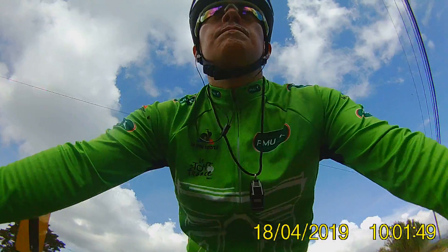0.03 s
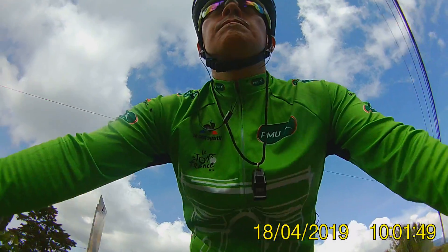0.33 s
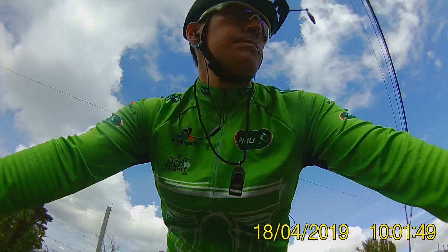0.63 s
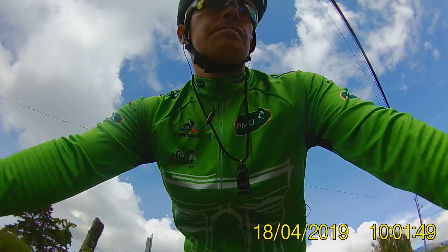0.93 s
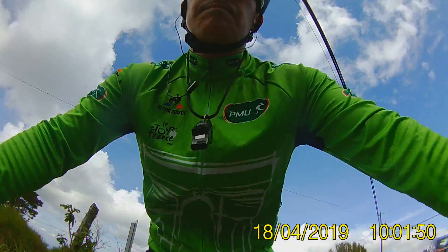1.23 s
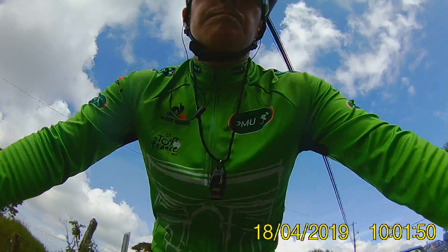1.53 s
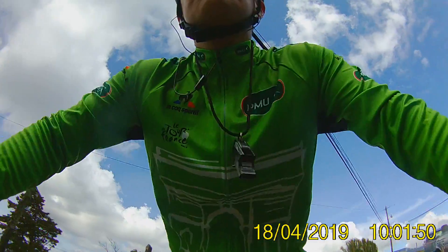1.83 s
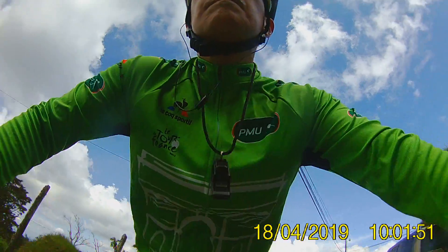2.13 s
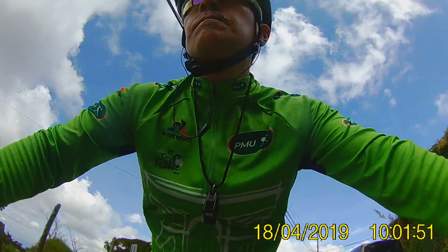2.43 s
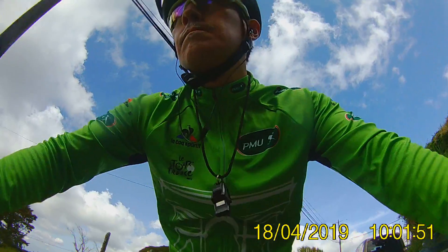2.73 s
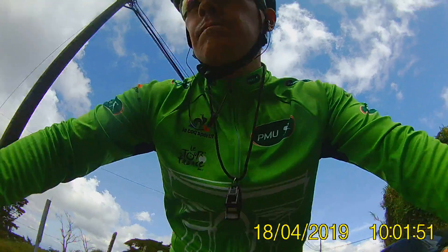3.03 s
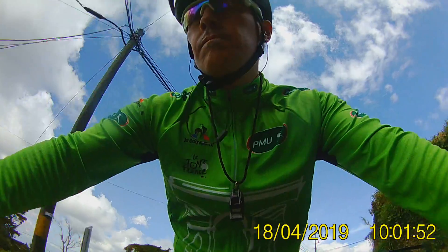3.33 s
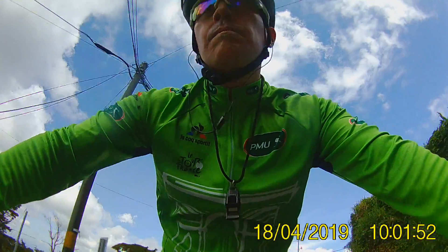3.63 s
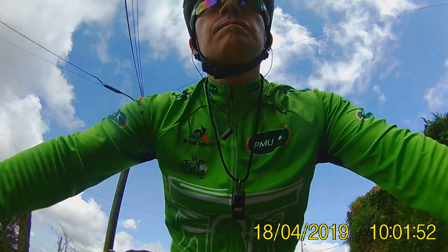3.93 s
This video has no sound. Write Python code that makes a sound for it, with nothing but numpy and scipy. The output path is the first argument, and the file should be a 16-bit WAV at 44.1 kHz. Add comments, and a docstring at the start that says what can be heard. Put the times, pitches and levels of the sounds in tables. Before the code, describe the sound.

A bicycle rattles outdoors over steady road rumble and wind, close to a handlebar microphone. Small ticks and faint chain clinks give way to loud metallic clacks and bumps as a low hum swells.

```python
"""A bicycle rolls along a road, heard from a camera fixed to its handlebar.
From the start the road shakes the mount into a low drone over wind and tyre noise; loose parts tick
and bumps knock the housing. From about 1 s the chain rubs, then clinks, and a low hum swells.
At 2.2 s a hard part slaps metal twice, overloading the microphone. Heavier knocks follow,
and from 3.7 s a second pair of clacks rings out."""
import sys
import numpy as np
from scipy import signal
from scipy.fft import rfft, irfft
from scipy.io import wavfile

SR = 44100
rng = np.random.default_rng(int(sys.argv[2]) if len(sys.argv) > 2 else 0)


def generate_wav(sig):
    """Save sig (samples, or channels by samples) to the path in sys.argv[1] as 16-bit PCM at SR."""
    pcm = np.round(np.clip(np.atleast_2d(sig).T, -1, 1) * 32767).astype(np.int16)
    wavfile.write(sys.argv[1], SR, pcm)


N = 176400
HIT_T = np.arange(SR // 2) / SR  # time axis of one hit, t/s

# Levels in the tables are relative; each layer adds its own trim.
# fader rides of the bed: t/s, hum/dB, frame ring/dB, tyre roar/dB, tyre hiss/dB
BED_LEVELS = [(0, -47, -27, -37, -47.5), (.69, -42, -27, -31, -42), (1.83, -28.5, -31.5, -40, -51),
              (2.4, -19.5, -27, -31.5, -44.5), (3.4, -17.5, -27, -36.5, -49), (4, -14, -24, -29.5, -41.5)]
# spectra of the wind rumble, the tyres' roar and their hiss: f/Hz, level/dB
WIND_EQ = [(15, -4), (55, -5), (72, -1.5), (85, -1), (135, 1), (165, -5), (250, -11), (390, -29),
           (900, -72.5)]
ROAR_EQ = [(390, -4.5), (560, 6.5), (700, -1.5), (880, 2.5), (1050, -12), (1170, 5.5), (1250, 9),
           (1400, -6.5), (1800, -11.5), (2600, -51)]
HISS_EQ = [(800, 11), (1020, -3), (1300, 10), (1700, 14), (2300, 3.5), (2950, 6.5), (3500, -6.5),
           (4200, -5), (5200, -15), (6400, -17.5), (16000, -54.5)]
# pitch of the low hum: t/s, f/Hz
HUM_PITCH = [(0, 200), (1.9, 192), (2.4, 180.5), (2.9, 195.8), (3.7, 196.4), (4, 216.3)]
# resonances of the frame: f/Hz, width/Hz, level/dB
FRAME_BANDS = [(312.6, 18.2, 3.5), (339.5, 18, -1.5), (446.2, 6.4, -8.5), (551.3, 26, -8)]
# fader ride of the mount's drone: t/s, level/dB
MOUNT_SHAKE = [(0.0, -2), (0.2, -42.5), (0.32, -14), (0.36, -30), (0.44, -27), (0.475, -14.5), (0.58, -7.5),
               (0.72, -16.5), (0.905, -33.5), (0.93, -7.5), (1.26, -14.5), (1.3, -20.5), (1.43, -7.5),
               (1.48, -26), (1.6, -8), (1.7, -19.5), (2.16, -10.5), (2.32, -20.5), (2.36, -9.5),
               (2.43, -16), (2.48, -8), (2.53, -20.5), (2.73, -22), (3.01, -8), (3.2, -22.5), (3.4, -8),
               (3.49, -21), (3.53, -8.5), (3.81, -18.5), (3.88, -5.5), (4.0, -12.5)]
# housing mode rung by small jolts: f/Hz, level/dB, t60/s
CHATTER_MODES = [(1260, 0, 0.04)]

# chain rubs: t/s, length/s, level/dB
RUB_CUES = [(0.925, 0.07, -44.5), (1.2, 0.18, -55), (1.67, 0.16, -50.5)]
# spectrum of a rub: f/Hz, level/dB
RUB_EQ = [(1200, -6.5), (2200, 14.5), (3500, -4.5), (5600, -8.5), (6400, 2), (6900, -19.5), (14000, -35)]
# clinks of single links: t/s
CLINK_CUES = [1.581, 1.632, 1.8945, 1.974, 3.412]
# modes of a link: f/Hz, level/dB, t60/s
LINK_MODES = [(2230, -42.5, .03), (8030, -54, .03)]

# ticks of loose parts: t/s, level/dB, tilt/(dB per octave)
TICK_CUES = [(0.026, -19.5, -6.5), (0.1103, -30.5, 0), (0.3197, -38.5, 4.5), (0.533, -22.5, -0.5),
             (0.5511, -15, 7.5), (0.613, -21, -4.5), (0.6705, -26, 1), (0.6975, -21, -3),
             (0.7198, -23.5, -2), (0.737, -28, -3), (0.8576, -27, -1.5), (1.096, -29, -4),
             (1.167, -20.5, 0), (1.1955, -22, -4.5), (1.2608, -22, -1.5), (1.3559, -20, -2),
             (1.4099, -31, -4), (1.497, -32, 2), (2.398, -32.5, 2.5), (2.8352, -10, 3), (2.851, -17.5, 0),
             (2.978, -30, 0), (3.638, -32, 6), (3.902, -16.5, -7)]
# modes of a loose part: f/Hz, level/dB, t60/s
LOOSE_MODES = [(1741, -0.5, 0.035), (2084, -4, 0.039), (2934, -13.5, 0.016)]
# spectrum of a tick's contact noise: f/Hz, level/dB
TICK_EQ = [(1050, 3), (1800, 9), (2900, 5), (3400, -6.5), (3900, 4.5), (5300, -19.5), (6300, -10.5),
           (8000, -24.5), (16000, -50)]

# bumps: t/s, housing knock/dB, frame thump/dB
KNOCK_CUES = [(0.024, -16, -9), (0.322, -19, -7), (0.462, -22.5, -15.5), (0.551, -19, -11.5),
              (0.766, -20.5, -22), (0.948, -12, -16.5), (1.315, -14, -19.5), (1.464, -28, -35),
              (2.573, -3, -10), (2.587, -2.5, -3), (2.8378, 1, -3.5), (2.85, -7.5, -10.5),
              (3.201, -22, -29.5), (3.501, -24, -49), (3.859, -3, -3.5), (3.906, -10, -4),
              (3.945, -21.5, -6.5)]
# modes of the housing and low modes of the frame: f/Hz, level/dB, t60/s
HOUSING_MODES = [(535, -14.5, 0.17), (775, -0.5, 0.014), (1253, -1.5, 0.048), (1596, -11, 0.037)]
THUMP_MODES = [(299.4, 2.5, 0.13), (259, -7, 0.094), (461, -8.5, 0.07)]
# spectrum of a knock's scuff: f/Hz, level/dB
SCUFF_EQ = [(200, -12.5), (650, 0.5), (1050, 0), (1350, 2), (2200, -12), (3200, -24.5), (9000, -45.5)]

# clacks: t/s, level/dB, tilt/(dB per octave), metal ring/dB, mode favoured by the contact point f/Hz
CLACK_CUES = [(2.2039, 15, -2, -24, 1880), (2.3116, 12.5, -2, -24, 3173), (3.7198, 11, -2, -26, 1781),
              (3.8554, 6, -1, -27.5, 1260)]
# modes of the slapping part and of the struck metal: f/Hz, level/dB, t60/s
PART_MODES = [(457, -25, 0.15), (700, -20, 0.083), (1262, -9, 0.04), (1846, -6.5, 0.037),
              (1975, -12.5, 0.05), (2355, -8.5, 0.022), (2800, -11.5, 0.012), (3145, -3.5, 0.014),
              (3880, 5.5, 0.016), (4460, 2, 0.014), (5505, 1, 0.0069), (7900, -13.5, 0.006)]
METAL_MODES = [(1810, -3, 0.22), (2110, -4.5, 0.31), (2220, -2, 0.32), (2400, -4, 0.29), (2560, -4, 0.17),
               (2893, -15.5, 0.25), (3080, -3, .14), (3560, -5.5, 0.13), (4200, -20, .3),
               (6730, -25.5, 0.29), (10900, -26, .13)]
# spectra of a clack's attack and its buzzing tail: f/Hz, level/dB
CRACK_EQ = [(200, 15.5), (2500, 6.5), (4500, -11), (9000, -33.5), (16000, -21.0)]
BUZZ_EQ = [(400, -6.0), (2200, 3.5), (4400, -7), (6000, -27.5)]

MOUNT_HZ, MOUNT_WANDER_HZ, MOUNT_WOBBLE_DB = 110.02, 3.5, 1.6
WIND_DB_PER_SHAKE_DB = 0.15
JOLTS_PER_S, KNOCK_RISE_S = 57, 0.0009
PATTER_PER_S, PATTER_VOICES, PATTER_SPREAD_DB = 47, 16, 3.5
CONTACT_DB, CONTACT_T60_S, METAL_UNEVEN_DB = 4, 0.022, 1.8
OVERLOAD_LEVEL, LOW_CUT_HZ, HIGH_CUT_HZ = 0.6, 30, 16300


def amp(db):
    """Decibels to gain."""
    return 10 ** (np.asarray(db) / 20)


def unit(x):
    """Scales to rms 1."""
    return x / np.sqrt(np.mean(x ** 2) + 1e-20)


def curve(rows, column=1):
    """One column of a time table as an automation curve."""
    rows = np.array(rows)
    return np.interp(np.arange(N) / SR, rows[:, 0], rows[:, column])


def add(mix, s, sound):
    """Mixes a sound in at time s."""
    part = mix[max(round(s * SR), 0):][:len(sound)]
    part += sound[:len(part)]


def eq(x, points):
    """Filters by an EQ curve drawn over log frequency."""
    f, db = np.transpose(points)
    hz = np.fft.rfftfreq(len(x), 1 / SR)
    return irfft(rfft(x) * amp(np.interp(np.log(hz + 1), np.log(f), db)), len(x))


def tilted(x, tilt_db):
    """Brightens or dulls by tilt_db per octave, pivoting at 2 kHz."""
    return eq(np.pad(x, (0, 2526)), [(500, -2 * tilt_db), (16000, 3 * tilt_db)])[:len(x)]


def noise(points, length=N):
    """Coloured noise at rms 1."""
    return unit(eq(rng.standard_normal(length), points))


def drift(rate_hz):
    """Smooth random modulation up to about rate_hz."""
    hz = np.fft.rfftfreq(N, 1 / SR)
    return unit(irfft(rfft(rng.standard_normal(N)) / (1 + (hz / rate_hz) ** 4), N))


def shaken(hz, width_hz):
    """A resonance driven at random: a narrow band of noise."""
    phase = 2 * np.pi * np.cumsum(hz * np.ones(N)) / SR
    return unit(drift(width_hz) * np.cos(phase) + drift(width_hz) * np.sin(phase))


def ring(modes, scatter=0, uneven_db=0):
    """Modes decaying after one blow, detuned by up to the fraction scatter and driven unevenly."""
    out = np.zeros(len(HIT_T))
    for hz, db, t60 in modes:
        decay = amp(db + uneven_db * rng.standard_normal() - 60 * HIT_T / t60)
        polarity = rng.choice([-1, 1])
        detuned_hz = hz * (1 + scatter * rng.uniform(-1, 1))
        out += decay * polarity * np.sin(2 * np.pi * detuned_hz * HIT_T)
    return out


def burst(points, t60, rise_s):
    """A short scrape of contact noise."""
    return noise(points, len(HIT_T)) * amp(-60 * HIT_T / t60) * (1 - np.exp(-HIT_T / rise_s))


def soft_attack(rise_s):
    """An S-shaped fade-in that rounds off a hit."""
    return 1 - np.exp(-(HIT_T / rise_s) ** 2)


def whine():
    """The camera's electronics give a faint, thin whine."""
    return amp(-73.5) * shaken(13760, width_hz=60)


def road_bed():
    """Wind rumbles, a low hum swells, the shaken frame rings and the tyres roar and hiss unevenly."""
    flutter_db = 2.2 * drift(rate_hz=60)
    shake_db = curve(MOUNT_SHAKE)
    wind = noise(WIND_EQ) * amp(-19 + WIND_DB_PER_SHAKE_DB * (shake_db - shake_db.mean()))
    hum = shaken(curve(HUM_PITCH), width_hz=22) * amp(curve(BED_LEVELS, column=1) - 1.5)
    bands = sum(amp(db) * shaken(hz, width) for hz, width, db in FRAME_BANDS)
    frame = unit(bands) * amp(curve(BED_LEVELS, column=2) - 0.5)
    roar = noise(ROAR_EQ) * amp(curve(BED_LEVELS, column=3) + flutter_db)
    hiss = noise(HISS_EQ) * amp(curve(BED_LEVELS, column=4) + flutter_db)
    return wind + hum + frame + roar + hiss


def housing_chatter():
    """The grain of the road keeps the housing chattering, riding the roar's fader."""
    jolts = (rng.random(N) < JOLTS_PER_S / SR) * rng.standard_normal(N)
    rattle = signal.oaconvolve(jolts, soft_attack(KNOCK_RISE_S) * ring(CHATTER_MODES))[:N]
    return amp(curve(BED_LEVELS, column=3) + 1.5) * rattle


def mount_drone():
    """The camera mount sways at its own pitch, as hard as the road shakes it."""
    phase = 2 * np.pi * np.cumsum(MOUNT_HZ + MOUNT_WANDER_HZ * drift(rate_hz=13.51)) / SR
    level_db = curve(MOUNT_SHAKE) + 0.5 + MOUNT_WOBBLE_DB * drift(rate_hz=22)
    return np.sqrt(2) * np.sin(phase) * amp(level_db)


def chain():
    """The chain rubs in short gritty spells, and single links clink."""
    spells, clinks = np.zeros(N), np.zeros(N)
    for s, length, db in RUB_CUES:
        add(spells, s, amp(db) * signal.windows.tukey(int(length * SR)))
    attack = 1 - np.exp(-HIT_T / KNOCK_RISE_S)
    for s in CLINK_CUES:
        add(clinks, s, attack * ring(LINK_MODES, uneven_db=METAL_UNEVEN_DB))
    return spells * noise(RUB_EQ) * amp(3 * drift(rate_hz=90)) + clinks


def tick():
    """One loose part taps: a short ring at its own pitch plus contact noise."""
    body = soft_attack(rise_s=0.0006) * ring(LOOSE_MODES, scatter=0.15)
    return body + amp(-4) * burst(TICK_EQ, t60=0.024, rise_s=0.0002)


def loose_parts():
    """Loose parts tick on cue, over a random patter of smaller ticks that rides the hiss's fader."""
    out = np.zeros(N)
    for s, db, tilt in TICK_CUES:
        add(out, s, amp(db) * tilted(tick(), tilt))
    patter_gain = amp(curve(BED_LEVELS, column=4) + 4)
    for _ in range(PATTER_VOICES):
        triggers = rng.random(N) < PATTER_PER_S / PATTER_VOICES / SR
        sizes = amp(PATTER_SPREAD_DB * np.minimum(rng.exponential(1, N), 3))
        out += patter_gain * signal.oaconvolve(triggers * sizes, tilted(tick(), tilt_db=1))[:N]
    return out


def knocks():
    """Soft-edged bumps jolt the housing and thump the frame."""
    out = np.zeros(N)
    attack = soft_attack(KNOCK_RISE_S)
    for s, db, thump_db in KNOCK_CUES:
        scuff = amp(-9) * burst(SCUFF_EQ, t60=0.06, rise_s=KNOCK_RISE_S)
        housing = amp(1) * ring(HOUSING_MODES, scatter=0.049)
        add(out, s, attack * amp(db) * (housing + scuff))
        add(out, s, attack * amp(thump_db - 3.5) * ring(THUMP_MODES, scatter=0.11))
    return out


def clacks():
    """A hard part slaps against metal, which rings on with a buzzing edge."""
    out = np.zeros(N)
    for s, db, tilt, ring_db, contact_hz in CLACK_CUES:
        crack = amp(2.5) * burst(CRACK_EQ, t60=0.027, rise_s=0.00018)
        buzz = amp(-6) * burst(BUZZ_EQ, t60=0.19, rise_s=0.002)
        body = ring(PART_MODES + [(contact_hz, CONTACT_DB, CONTACT_T60_S)], scatter=0.014)
        metal = ring(METAL_MODES, uneven_db=METAL_UNEVEN_DB)
        add(out, s, amp(db) * tilted(body + crack, tilt))
        add(out, s, amp(ring_db) * (metal + buzz))
    return out


def scene():
    """The mono mix: the rolling bed, then the hits, the chain and the whine."""
    rolling = mount_drone() + road_bed() + housing_chatter()
    return (rolling + clacks() + knocks() + loose_parts() + chain() + whine())[None]


def record(dry):
    """The input overloads, its coupling tilts the flattened peaks, and the top end is cut."""
    drive = signal.resample_poly(dry, 4, 1, axis=1) / OVERLOAD_LEVEL  # oversampled against aliasing
    saturated = drive / (1 + drive ** 12) ** (1 / 12)
    flattened = OVERLOAD_LEVEL * signal.resample_poly(saturated, 1, 4, axis=1)
    coupled = signal.lfilter(*signal.butter(1, LOW_CUT_HZ, "high", fs=SR), flattened)
    high_cut = signal.firwin(255, HIGH_CUT_HZ, window=("kaiser", 9), fs=SR)
    return signal.oaconvolve(coupled, high_cut[None], "same")


dry = scene()
out = record(dry)
generate_wav(out)
```